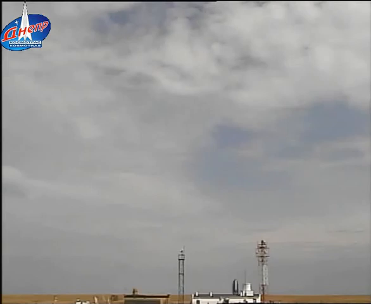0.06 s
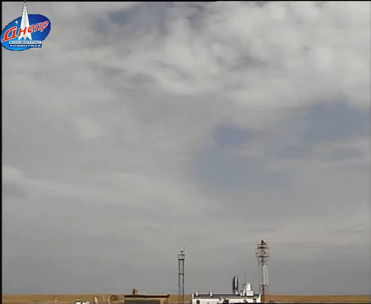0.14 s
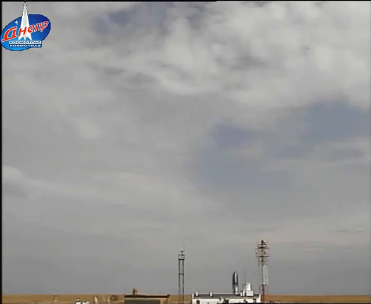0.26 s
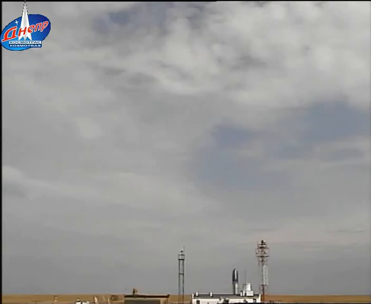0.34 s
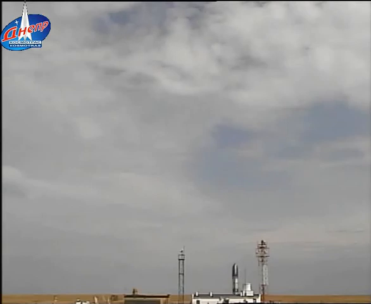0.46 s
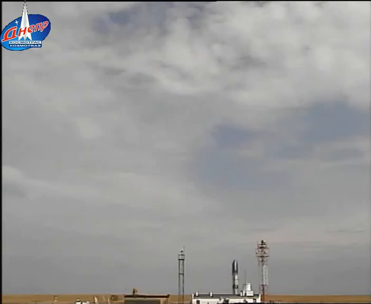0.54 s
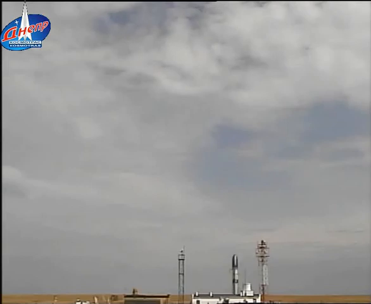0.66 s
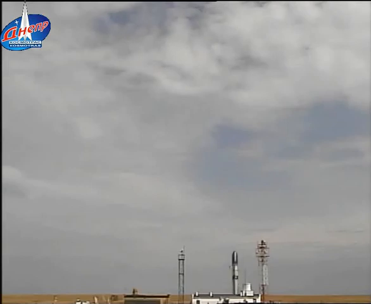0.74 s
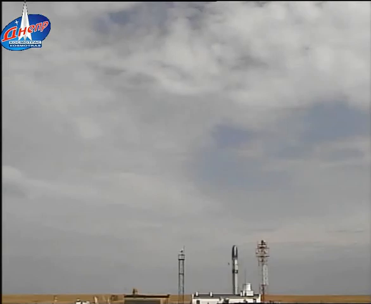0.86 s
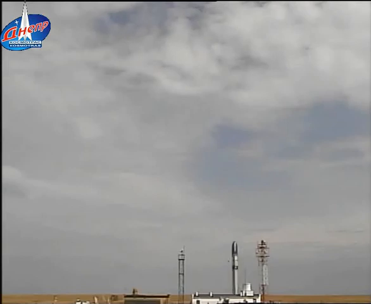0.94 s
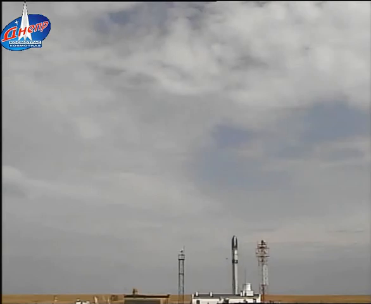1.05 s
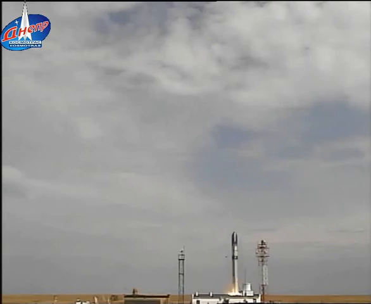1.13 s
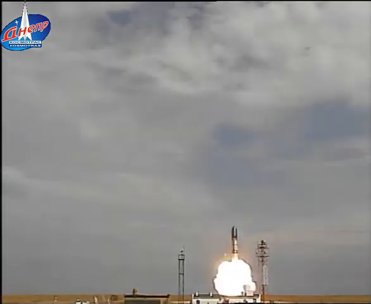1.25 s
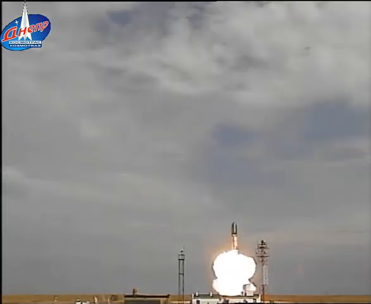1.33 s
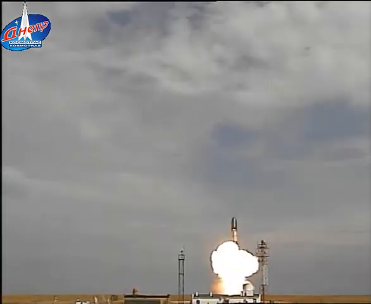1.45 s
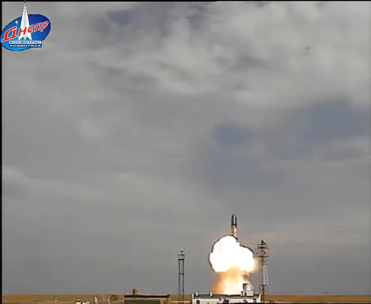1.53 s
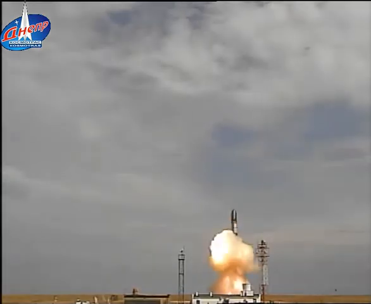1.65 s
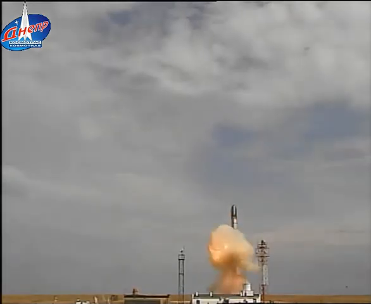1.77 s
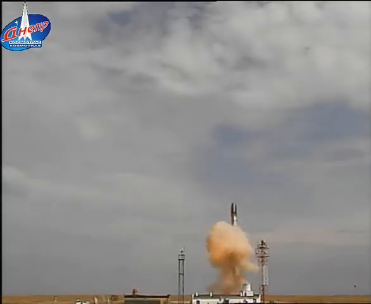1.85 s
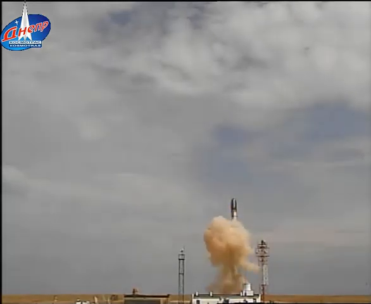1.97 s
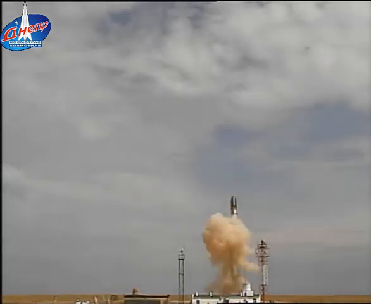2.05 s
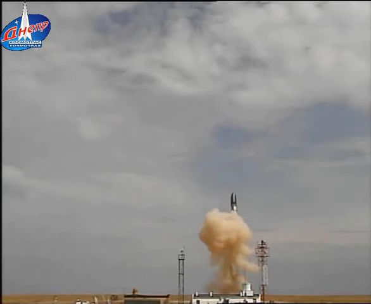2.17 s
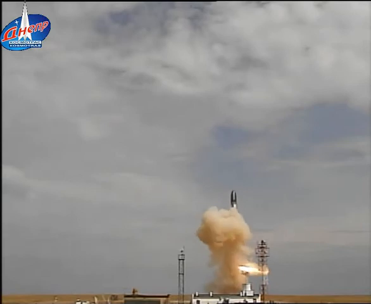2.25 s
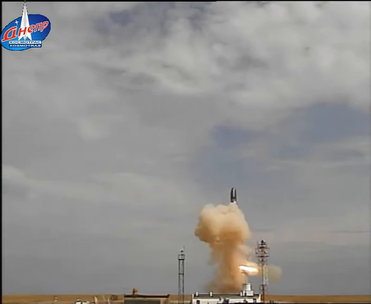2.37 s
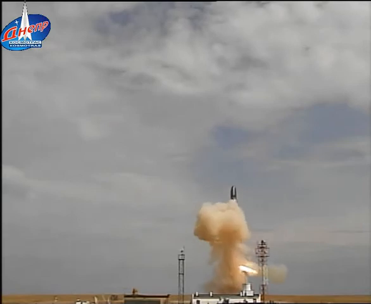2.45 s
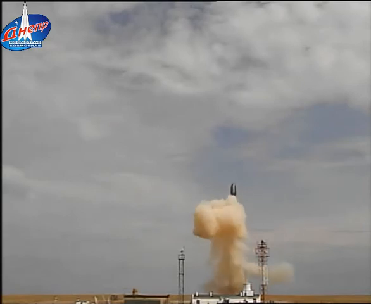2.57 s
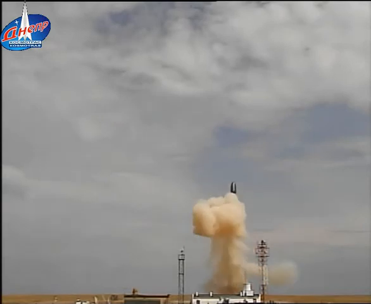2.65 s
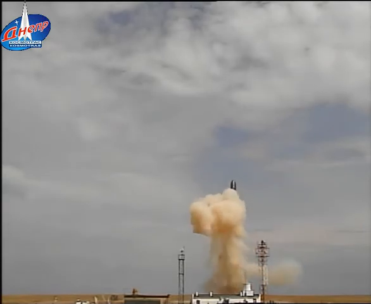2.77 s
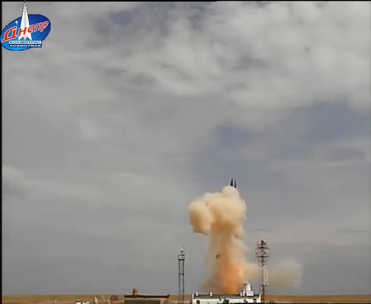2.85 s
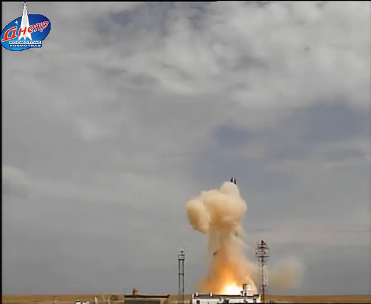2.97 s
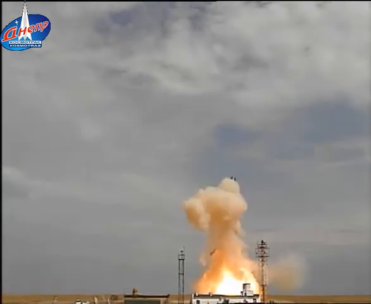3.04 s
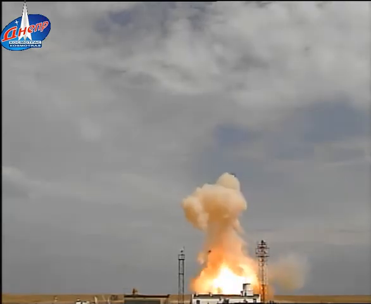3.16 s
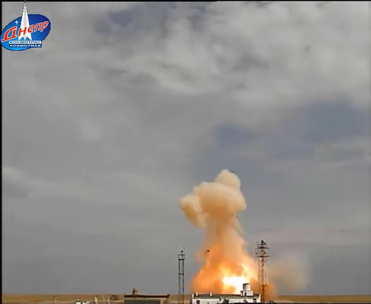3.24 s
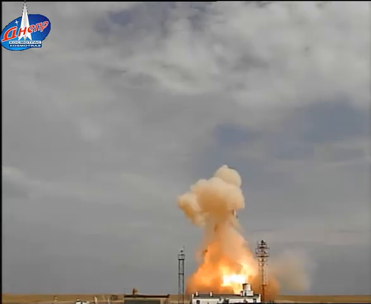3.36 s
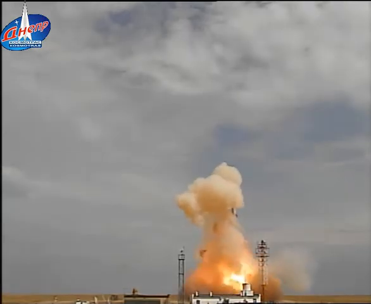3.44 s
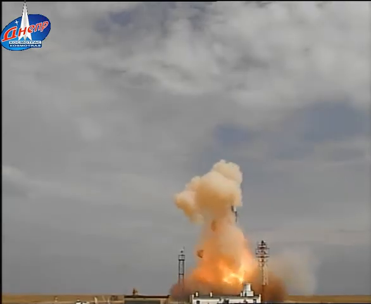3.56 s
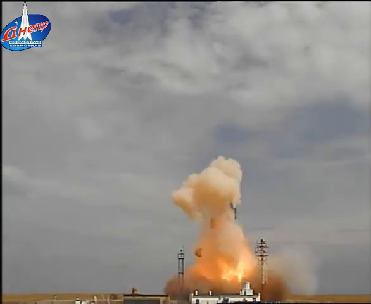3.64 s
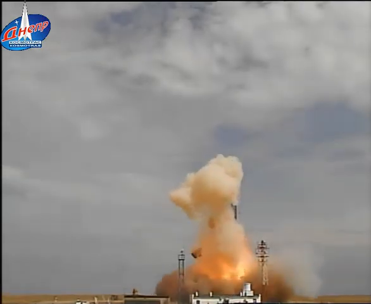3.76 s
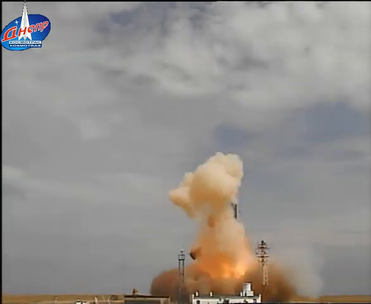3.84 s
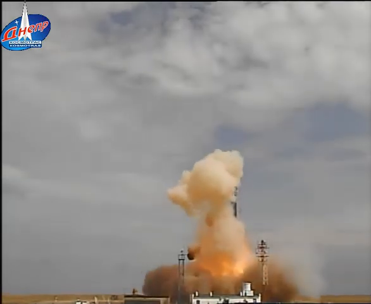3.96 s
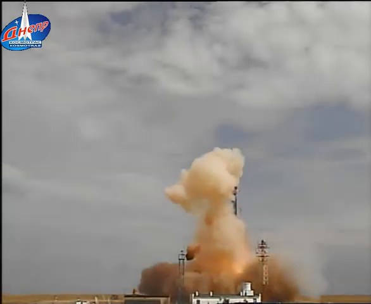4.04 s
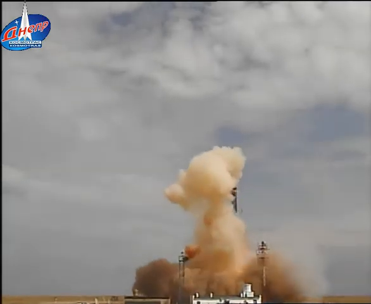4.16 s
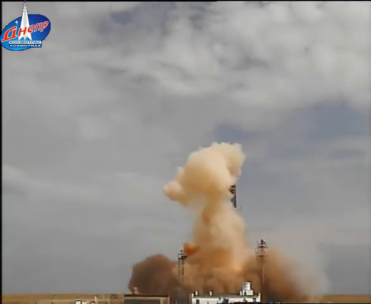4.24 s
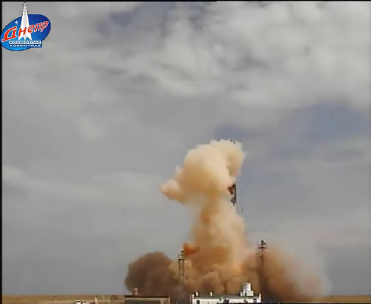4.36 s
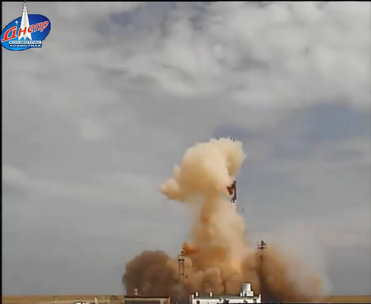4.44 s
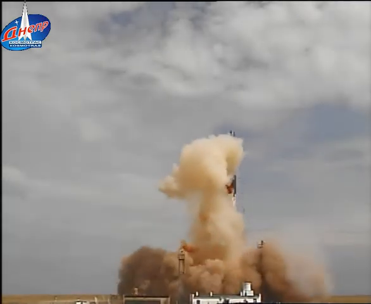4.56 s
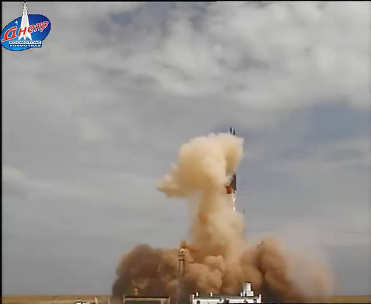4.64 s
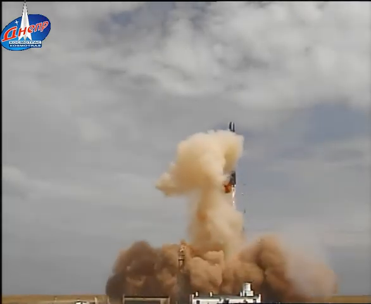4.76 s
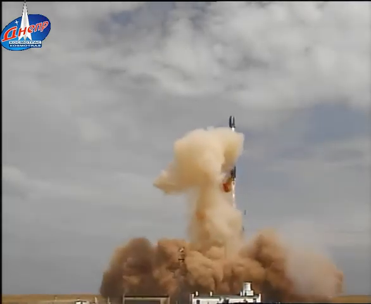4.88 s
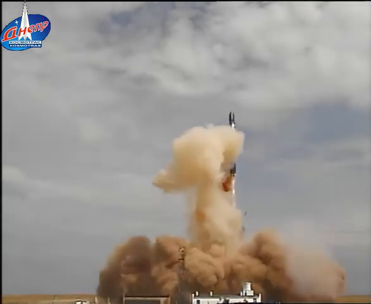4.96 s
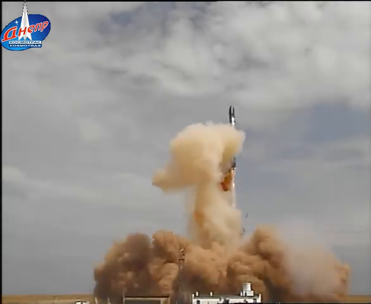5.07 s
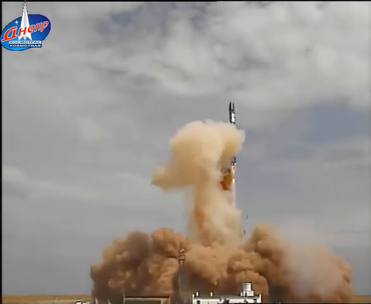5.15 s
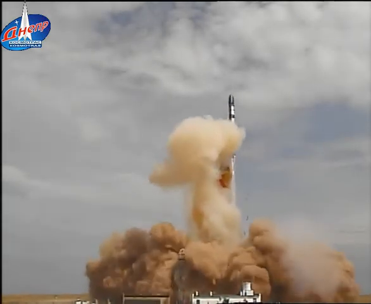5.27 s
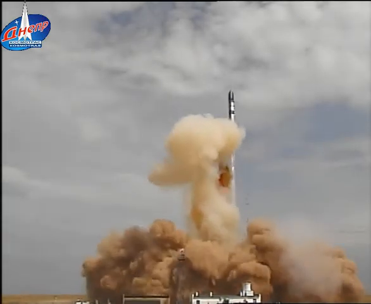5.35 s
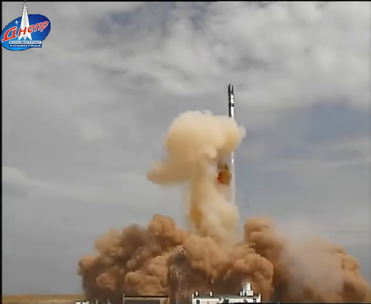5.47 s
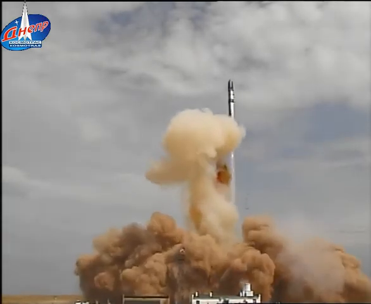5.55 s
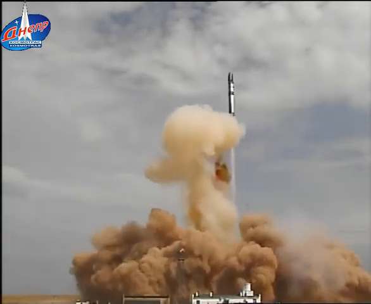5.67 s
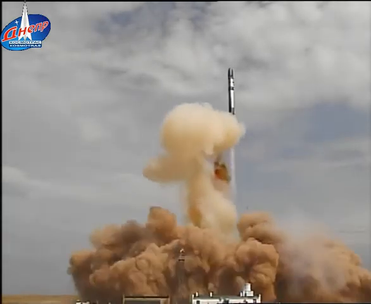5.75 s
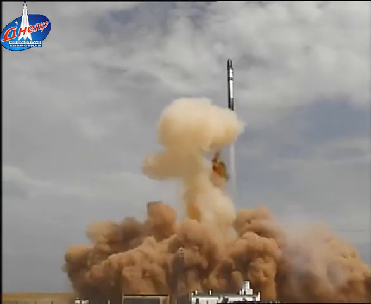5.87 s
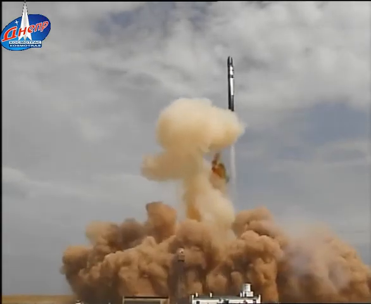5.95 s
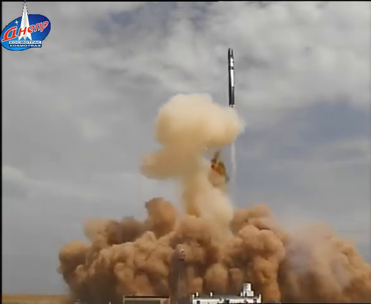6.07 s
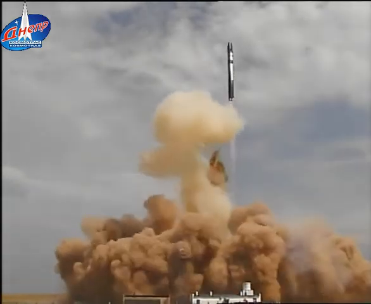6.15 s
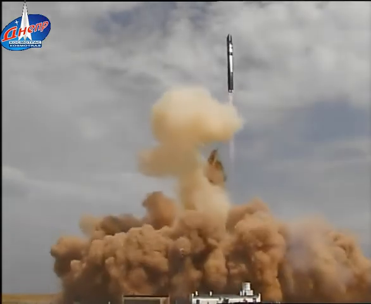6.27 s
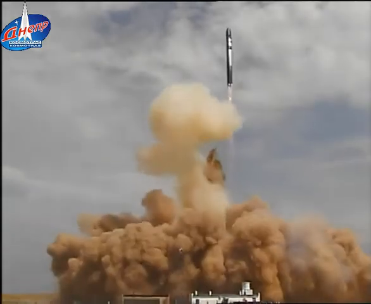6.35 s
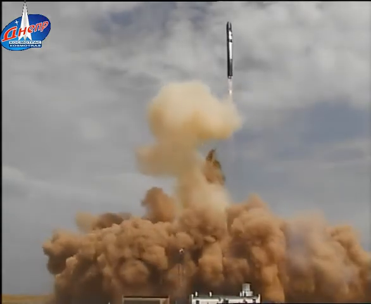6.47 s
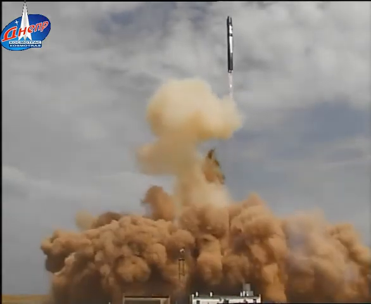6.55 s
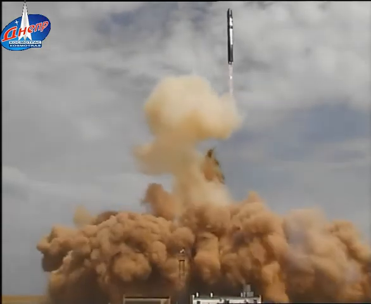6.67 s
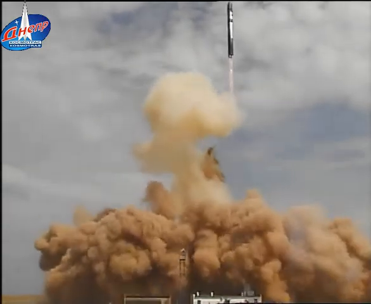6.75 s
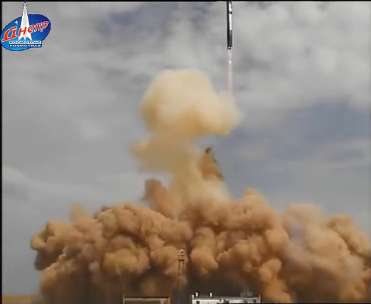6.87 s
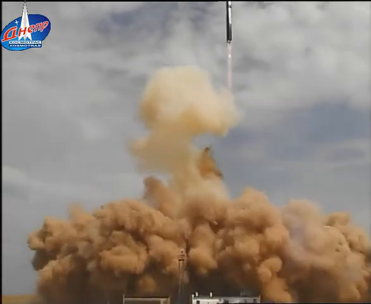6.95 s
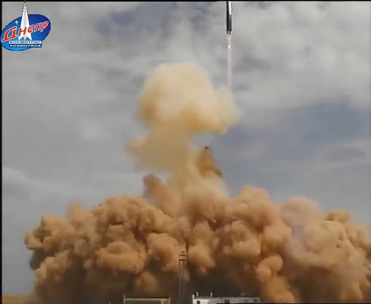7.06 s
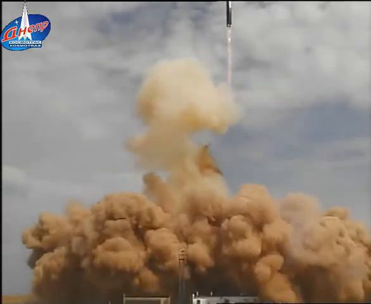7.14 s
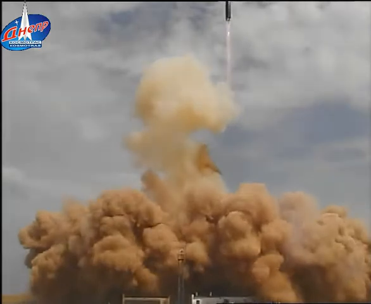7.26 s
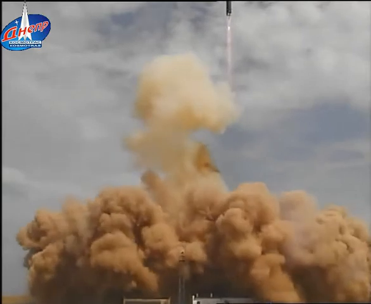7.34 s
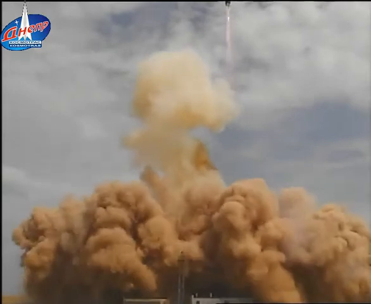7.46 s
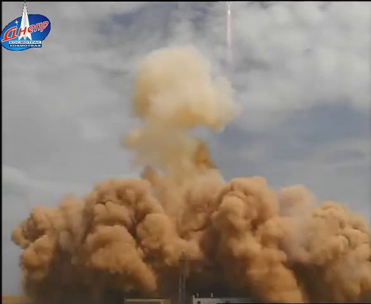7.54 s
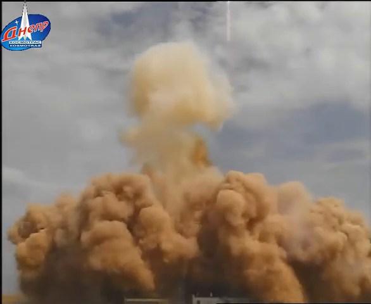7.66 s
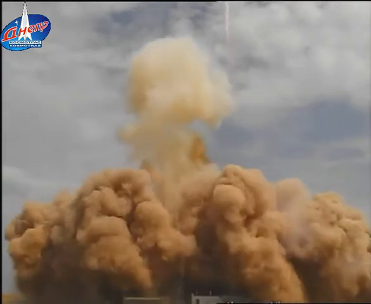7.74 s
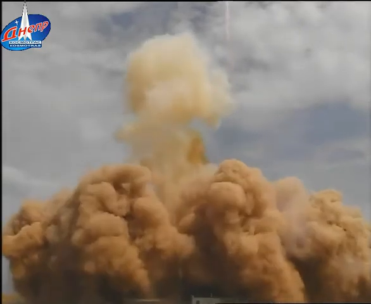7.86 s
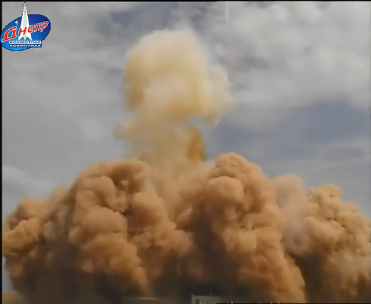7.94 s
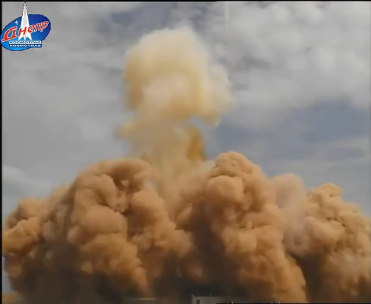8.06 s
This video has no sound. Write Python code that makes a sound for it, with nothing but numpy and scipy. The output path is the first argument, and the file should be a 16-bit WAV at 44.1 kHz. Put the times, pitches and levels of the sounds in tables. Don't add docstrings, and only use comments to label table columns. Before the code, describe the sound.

Outdoors on open ground, wind slaps and crackles lightly against a narrow-band microphone. A sharp bang cracks far off and rolls away, then a duller, denser one follows a second later. Suddenly rocket engines burst in, overloading the microphone into a harsh, gritty digital tearing over the roar. Later the distortion breaks into rapid sputters, leaving a wavering, throbbing jet rumble as the rocket climbs.

```python
import sys
import numpy as np
from scipy import signal
from scipy.fft import rfft, irfft, next_fast_len
from scipy.io import wavfile
from scipy.ndimage import uniform_filter1d, map_coordinates

SR = 44100
rng = np.random.default_rng(int(sys.argv[2]) if len(sys.argv) > 2 else 0)


def volts(x):
    e = np.asarray(x, float) / 20
    return 10 ** e


def master(y):
    cut = np.clip(np.atleast_2d(y).T, -1, 1)
    pcm = np.round(cut * 32767)
    wavfile.write(sys.argv[1], SR, pcm.astype(np.int16))


N = 357651

# t/s, level/dB
ROAR_LEVEL = [(2.895, -50), (2.905, -33.5), (2.945, -17), (3.0, -8.5), (3.06, -11), (3.3, -14), (3.5, -14),
              (3.79, -11.5), (5.04, -10), (5.41, -12.5), (6.08, -10.5), (6.7, -13.5), (7.06, -13.5),
              (7.1, -18), (7.13, -12.5), (7.75, -16), (7.93, -12.5), (8.11, -17)]
# f/Hz, level/dB per Hz
JET_SPECTRUM = [(47, -46), (80, -10.5), (156, -4.5), (262, -2.5), (413, -4.5), (519, -5), (792, -3),
                (1270, -4.5), (2470, -13), (3900, -23.5), (5070, -47), (8580, -120)]
# t/s, level/dB re jet
GROUND_SHARE = [(2.9, -1.5), (3.0, -4.5), (3.14, -7.5), (3.43, -16), (3.6, -14), (5.5, -10.5), (6.33, -8.5),
                (6.52, -16.5), (8.11, -18.5)]
# f/Hz, level/dB per Hz
THUD_SPECTRUM = [(15, -31.5), (30, -6), (120, -4), (300, -28)]


def engines():
    jet_db, = curves(ROAR_LEVEL)
    ground_db, = curves(GROUND_SHARE)
    gusty_from_s, gusty_db, heave_db = 5.9, 1.5, 2.5
    late = np.clip(np.arange(N) / SR - gusty_from_s, 0, 1)
    surge_db = 1.03 * wobble(30) + gusty_db * late * wobble(17)
    rumble_db = jet_db + ground_db + heave_db * wobble(8)
    jet = volts(jet_db + surge_db) * rush(JET_SPECTRUM, crackle_db=1.9, rate=200)
    rumble = volts(rumble_db + 2.5) * rush(THUD_SPECTRUM)
    return jet + rumble


# t/s, length/ms, level/dB
IGNITION_BURSTS = [
    (2.956, 23, -10),
    (2.9846, 1.5, -10.5),
    (2.9905, 32, -9.5),
    (3.0285, 3, 1),
    (3.04, 7.9, -9),
    (3.0546, 4.1, -12),
    (3.0613, 21.7, -11),
]
# t/s, length/ms, level/dB
SPUTTER_BURSTS = [(6.3085, 23.7, -9), (6.3449, 13.5, -8), (6.3816, 14, -7.5), (6.42, 7.6, -4),
                  (6.4468, 43, -7), (6.5278, 13.1, -8.5), (6.5704, 11.5, -7), (6.6042, 20.9, -6.5),
                  (6.6422, 14, -9.5), (6.6847, 1.5, -11.5), (6.73, 1.5, -5.5), (6.8165, 1.6, -9.5),
                  (6.8394, 9.7, -8), (6.877, 3.8, -8.5), (6.9317, 1.66, -9), (6.985, 14, -10.5),
                  (7.0631, 7.1, -10.5), (7.1055, 1.6, -10.5), (7.1473, 2, -8), (7.2558, 5, -4.5),
                  (7.2956, 1.84, -8), (7.3322, 13, -9.5), (7.3609, 1.6, -12), (7.409, 10.5, -7),
                  (7.446, 5.4, -8), (7.5337, 1.3, -11), (7.8311, 13.4, -7), (7.8634, 13, -8.5),
                  (7.9031, 9.5, -9.5), (7.949, 1.3, -12.5)]
# t/s, margin before it lapses, level/dB
STEADY_GRIP = [(3.08, 1.5, -7.5), (3.5, 2.5, -7.5), (4.5, 1.53, -8), (4.8, 1.3, -10), (5.05, 1.72, -8),
               (5.7, 1.44, -8), (5.9, 1.25, -7.5), (6.1, .2, -8.5), (6.2, 1.5, -8.5), (6.3, -0.56, -9.5),
               (6.7, -1.56, -7.5)]
THROB_HZ, THROB_CREST_S = 26.25, 6.312
THROB_DEPTH, THROB_FROM_S, THROB_FULL_S = 0.9, 5.39, 6.23


def chatter():
    t = np.arange(N) / SR
    start, ms, db = np.transpose(IGNITION_BURSTS + SPUTTER_BURSTS)
    end = start + np.maximum(ms, 1.2) / 1000
    corners = np.transpose([start - .0003, start + .0003, end - .0006, end]).ravel()
    heights = np.outer(volts(1.4 * (db + 12) + 4.5), [0, 1, 1, 0]).ravel()
    bursts = np.interp(t, corners, heights)
    age = t - start[np.clip(np.searchsorted(start, t) - 1, 0, None)]
    lapses = wobble(300)
    fresh = 3 * np.exp(-np.abs(age) / 0.0029)
    bursts *= np.clip(1.03 * (lapses + 0.88 + fresh), 0, 1)

    margin, level_db = curves(STEADY_GRIP)
    depth = np.interp(t, [THROB_FROM_S, THROB_FULL_S], [0, THROB_DEPTH])
    throb = depth * np.cos(2 * np.pi * THROB_HZ * (t - THROB_CREST_S))
    drift = .4 * wobble(40)
    hold = np.clip(1.06 * (lapses + margin + throb + drift), 0, 1)
    steady = volts(1.44 * (level_db + 12) + 4.5) * hold
    return np.maximum(bursts, steady)


# f/Hz, level/dB per Hz
SWING_SPECTRUM = [(100, -16.5), (800, -9.5), (1800, -8.5), (3300, -2.5), (3900, -0.5)]
# hit t/s, release t/s, free t/s, rail sign
STUCK_WAVES = [
    (3.012, 3.016, 3.029, 1),
    (3.030, 3.040, 3.041, -1),
    (3.5145, 3.522, 3.534, 1),
    (3.534, 3.540, 3.541, -1),
    (3.543, 3.545, 3.546, -1),
]
RAIL = .705


def overload(x):
    t = np.arange(N) / SR
    drive = chatter()
    swing = np.tanh(1.114 * rush(SWING_SPECTRUM))
    x = x / (1 + 0.055 * drive) + drive * swing
    for hit, release, free, sign in STUCK_WAVES:
        hold = np.interp(t, [hit - .0002, hit, release, free], [0, 1, .93, 0])
        stuck = .7 * x * (1 - hold) + sign * .98 * RAIL * hold
        x = np.where(hold > 0, stuck, x)
    return x


# t/s, level/dB
BANG_ROLLS = [
    [(1.195, -32), (1.209, -31), (1.229, -21), (1.269, -17.5), (1.369, -32), (1.433, -34.5), (1.719, -41.5),
     (1.95, -50)],
    [(2.25, -75), (2.264, -33.5), (2.3, -18.5), (2.404, -16.5), (2.612, -22.5), (2.788, -39.5), (2.81, -33),
     (2.9, -36)],
]
# edge first/dB, edge later/dB, thud first/dB, thud later/dB
BANG_COLOURS = [
    (-8, -1, -4.5, -11),
    (-13.5, -3.5, -13, -23),
]
# t/s, peak level/dB, f/Hz
SHOCK_FRONTS = [(1.197, -14, 1010), (1.222, -11, 1200), (1.230, -7, 800), (1.2454, -17, 343),
                (1.2513, -24, 500), (1.2621, -12, 1900), (1.257, -7, 1500), (1.2634, 3, 1800),
                (1.2676, 3, 1610), (1.273, -10, 1500), (1.302, -8, 1300), (1.237, -12, 219),
                (2.27, -23, 450), (2.28, -19, 240), (2.297, -13, 260), (2.2846, -12, 900),
                (2.299, -13, 700), (2.3027, -7, 850), (2.3421, -7, 1000), (2.3835, -8, 900),
                (2.905, -22, 1000), (2.917, -11, 1087), (2.9406, -16, 400), (2.942, -11, 600),
                (2.948, -13, 260)]
# f/Hz, level/dB per Hz
GAS_SPECTRUM = [(71, -30), (120, -20), (167, -18), (243, -5), (454, -1.5), (588, -3), (837, 1), (2000, -9),
                (2600, -27), (4400, -120)]
# f/Hz, level/dB per Hz
EDGE_SPECTRUM = [(900, -42), (1600, -8), (2500, -4.5), (3900, -13)]


def bangs():
    body = rush(GAS_SPECTRUM, crackle_db=1.0, rate=82)
    bright = rush(EDGE_SPECTRUM, crackle_db=-1.5, rate=100)
    low = rush(THUD_SPECTRUM)
    out = np.zeros(N)
    settle_s = 0.11
    for rows, (edge, late_edge, thud, late_thud) in zip(BANG_ROLLS, BANG_COLOURS):
        level_db, = curves(rows)
        fresh = np.exp(-np.abs(np.arange(N) / SR - rows[1][0]) / settle_s)
        edge_db = late_edge + (edge - late_edge) * fresh
        thud_db = late_thud + (thud - late_thud) * fresh
        out += volts(level_db) * (body + volts(edge_db) * bright + volts(thud_db + 3) * low)

    t = np.arange(SR // 100) / SR
    for s, db, hz in SHOCK_FRONTS:
        fade = volts(db + 9 - 60 * t * hz / 4.7)
        onset = 1 - np.exp(-t * hz * 6)
        out[round(s * SR):][:len(t)] += fade * onset * np.sin(2 * np.pi * hz * t)
    return rounded(out, .55)


# t/s, level/dB
GUSTS = [
    [(0.0, -39), (0.082, -39), (0.164, -54), (0.298, -31), (0.324, -42.5), (1.016, -39.5), (1.06, -55),
     (1.106, -40), (1.19, -35)],
    [(1.9, -62), (1.946, -37), (2.128, -39), (2.158, -51), (2.218, -55), (2.26, -35)],
    [(2.7, -55), (2.78, -40), (2.9, -50)],
]
# f/Hz, level/dB per Hz
BUFFET_SPECTRUM = [(12, -20), (20, -17), (70, 2), (217, -10), (285, -12), (409, -18), (439, -12.5),
                   (1500, -24.5), (1950, -68.5), (3300, -120)]
# f/Hz, level/dB per Hz
HISS_SPECTRUM = [(410, -31), (700, -15), (1240, -9), (1350, -2), (3900, 7), (5070, -30.5), (8580, -120)]
# t/s, jump/thousandths of full scale, length/ms
EDDY_SLAPS = [(0.0002, -140, 0.31), (0.0654, 46, 6.8), (0.0806, 53, 4.1), (0.0855, 42, 15.6),
              (0.1145, 43, 1.5), (0.2412, 38, 2.6), (0.2749, 53, 3.2), (0.2844, 64, 4.7), (0.2986, 65, 2.1),
              (0.3042, 77, 1.4), (0.4578, -35, 3.8), (0.481, -33, 2.6), (0.4902, 45, 3.9), (0.4994, 56, 2),
              (0.529, 51, 1.8), (0.7401, 36, 5.6), (0.7826, -47, 1.8), (0.794, 55, 2.4), (0.8625, 55, 5.7),
              (0.955, -50, 1.6), (1.121, 50, 4), (1.4183, 75, 5.3), (1.941, 63, 0.91), (1.9447, 45, 1.4),
              (1.9518, 52, 3.7), (1.9927, 61, 11), (2.0476, 52, 4.8), (2.077, 58, 3.3), (2.1139, 37, 4.5)]
CALM_DB, HISS_DB, HISS_GROWS, BUFFET_DB = -47.5, -50.5, 0.24, -7


def wind():
    eddies = volts(2.4 * wobble(110) + .8 * wobble(25))
    flicks = -np.clip(wobble(2500) - 1.2, 0, None)
    flicks -= np.clip(3 * (wobble(600) - 1.1), 0, 1)
    ticking = coloured(flicks, [(20, -30), (120, 0), (1000, 0), (4000, 4)])
    crackle = eddies * (1.1 * ticking + .45 * rush(HISS_SPECTRUM))
    buffet = rush(BUFFET_SPECTRUM, crackle_db=2.5, rate=40)
    out = volts(-57) * rush(BUFFET_SPECTRUM) + volts(-62) * (crackle + .9 * rush(HISS_SPECTRUM))

    strength_db = np.max([curves(rows)[0] for rows in GUSTS], axis=0)
    crackle_level = volts(HISS_DB + HISS_GROWS * (strength_db - CALM_DB))
    out += (strength_db > -100) * crackle_level * crackle
    out += volts(strength_db + BUFFET_DB) * buffet

    s, jump, ms = np.transpose(EDDY_SLAPS)
    edges = np.round(np.append(s, s + ms / 1000) * SR).astype(int)
    steps = np.bincount(edges, np.append(jump, -.95 * jump) / 1000, N)
    shoved = rng.random(N) < 25 / SR
    steps += shoved * np.sign(rng.standard_normal(N)) * volts(np.minimum(strength_db + 6.5, -28))
    steps = uniform_filter1d(steps, size=15)
    leak = np.exp(-1 / (.0075 * SR))
    return out + signal.lfilter([1], [1, -leak], steps)


def curves(rows, off_db=-120):
    s, level, *others = np.transpose(rows)
    t = np.arange(N) / SR
    return [np.interp(t, s, level, off_db, off_db)] + [np.interp(t, s, c) for c in others]


def wobble(rate):
    knots = rng.standard_normal(int(N * rate / SR) + 4)
    return map_coordinates(knots, [np.arange(N) * rate / SR])


def shaped(x, points):
    m = next_fast_len(N + 8192)
    hz, db = np.transpose(points)
    bins = np.fft.rfftfreq(m, 1 / SR)
    gain = volts(np.interp(np.log(bins + 1), np.log(hz + 1), db))
    return irfft(rfft(x, m) * gain, m)[:N]


def coloured(x, points):
    y = shaped(x, points)
    return y / np.std(y)


def rush(points, crackle_db=0, rate=150):
    return coloured(volts(crackle_db * wobble(rate)) * rng.standard_normal(N), points)


def rounded(x, limit):
    return x / (1 + (x / limit) ** 4) ** .25


def scene():
    return (rounded(engines(), .76) + bangs() + wind())[None]


# f/Hz, level/dB
TREBLE_SLOPE = [(4000, 0), (9000, -1), (15900, -3), (16200, -60)]


def top_cut(x):
    return signal.sosfilt(signal.butter(12, 16670, fs=SR, output="sos"), x)


def record(dry):
    slow = signal.resample_poly(overload(dry[0]), 80, 441)
    slow = np.clip(slow, -RAIL, RAIL)
    smooth = signal.firwin(40 * 441 + 1, 4050, window=("kaiser", 9), fs=8000 * 441)
    full = signal.resample_poly(slow, 441, 80, window=smooth)[:N]
    full = np.clip(np.pad(full, (0, N - len(full))), -RAIL, RAIL)
    return top_cut(shaped(full, TREBLE_SLOPE)[None])


dry = scene()
out = record(dry)
master(out)
```